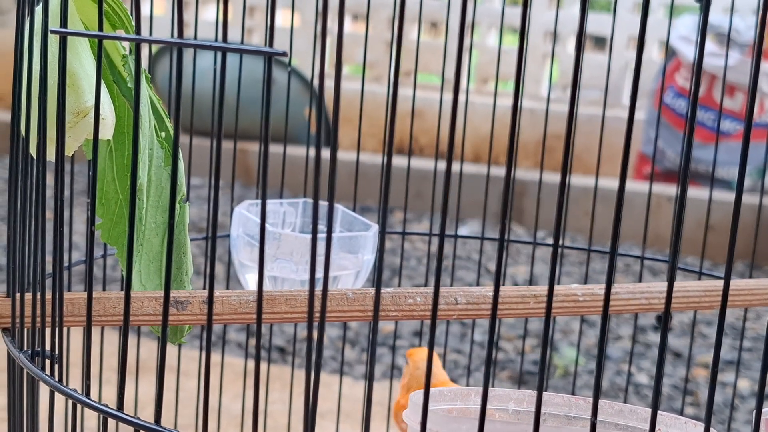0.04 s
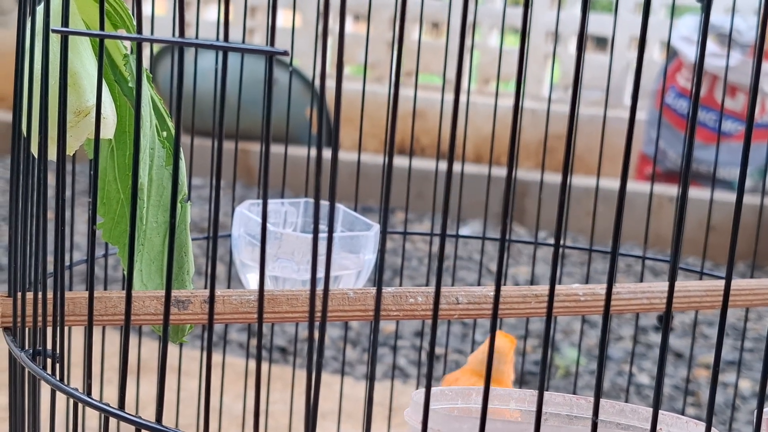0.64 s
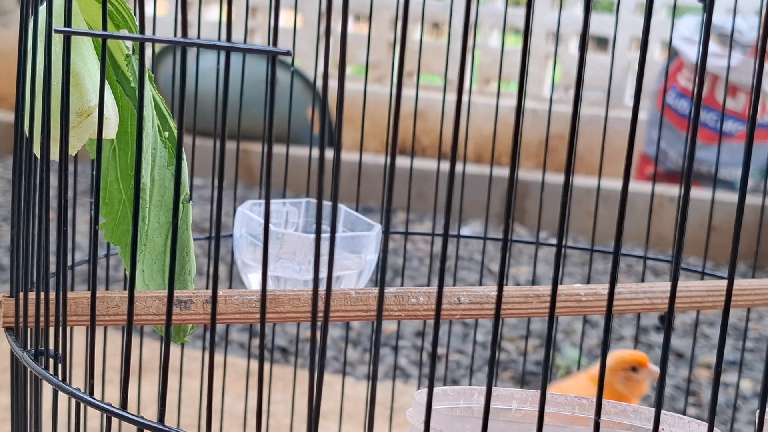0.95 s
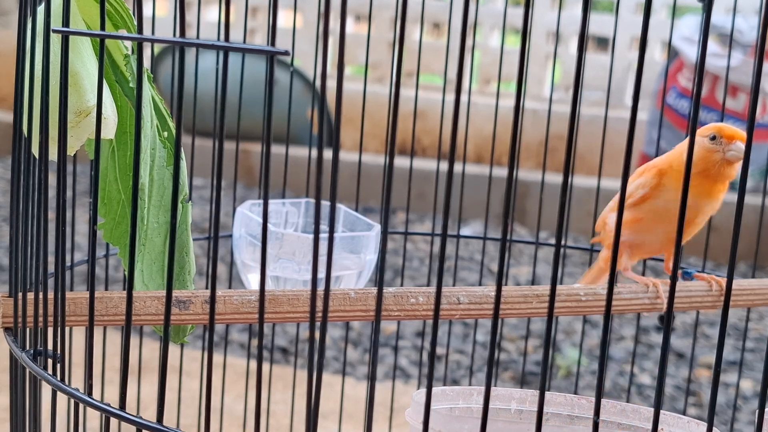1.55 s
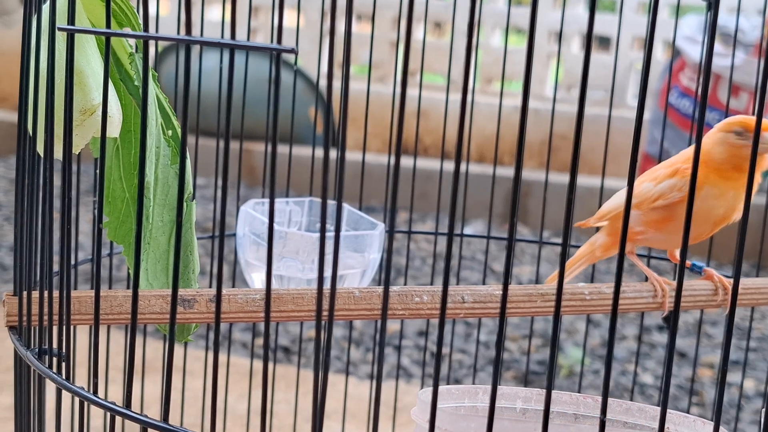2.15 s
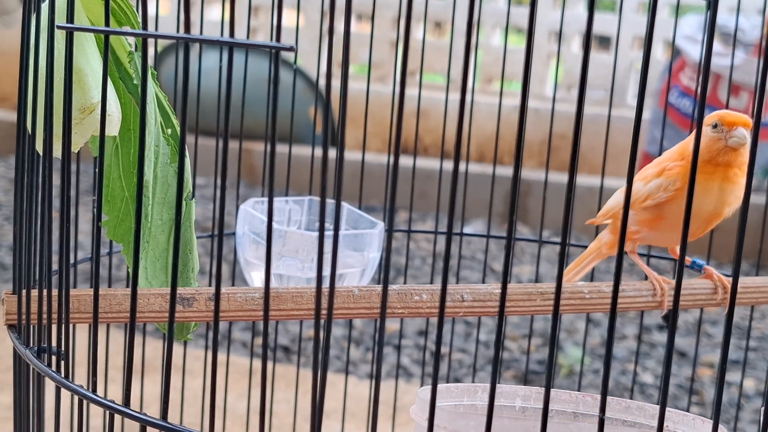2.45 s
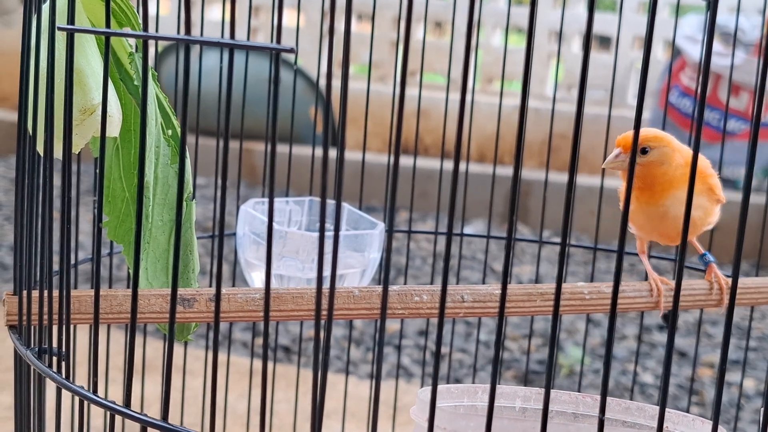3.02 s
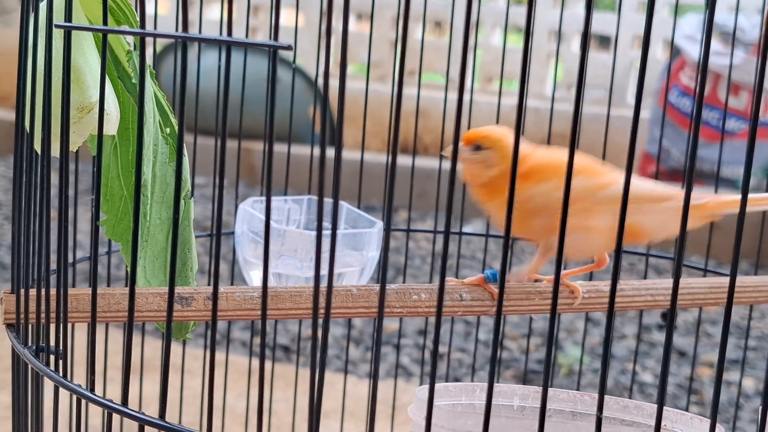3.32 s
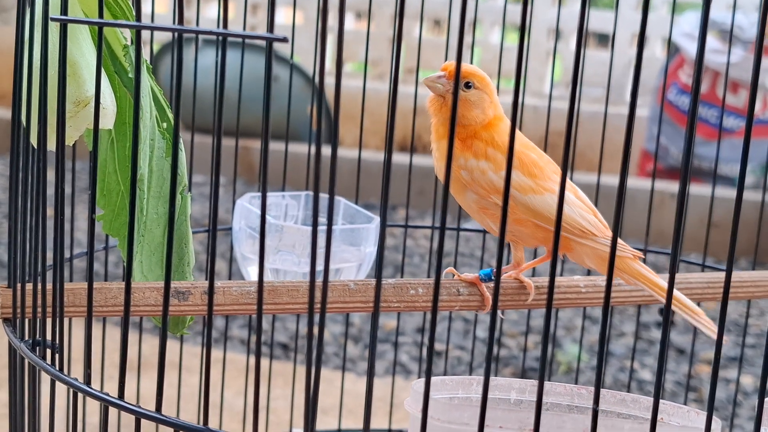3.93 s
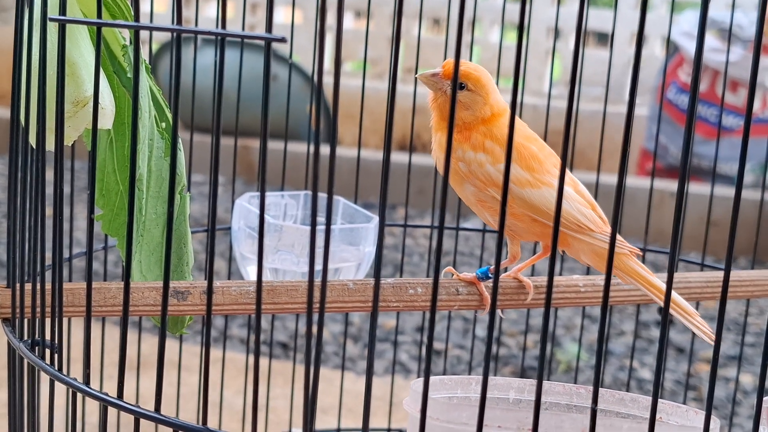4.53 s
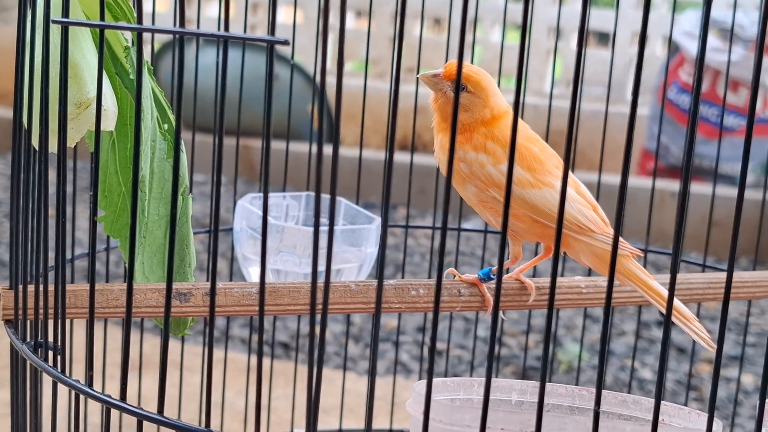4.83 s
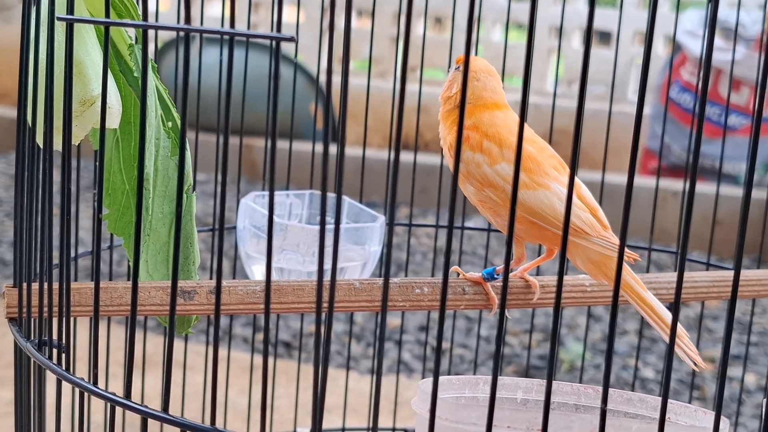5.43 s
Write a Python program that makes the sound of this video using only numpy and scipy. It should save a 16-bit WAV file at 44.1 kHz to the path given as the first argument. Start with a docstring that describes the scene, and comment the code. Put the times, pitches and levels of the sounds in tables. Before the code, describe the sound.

Outdoors, a low motor hums steadily under a soft wash of air, faint bouts of insect buzzing and distant warbling birds. Near the microphone, a canary's claws and beak tick on its cage. The canary lets out a rapid run of sharp, high chirps, rustles faintly, then chirps a second run, the yard walls briefly throwing the sound back. After that, only the hum and the faint background remain.

```python
"""Caged canary in a yard

A close canary gives two quick bursts of sharp chirps; in some, both sides of its syrinx sound at once.
Its feet and beak tick on the cage, and the yard walls throw the chirps back. Other birds warble softly
further off, an insect buzzes in bouts and a motor hums, over a low wash and a faint hiss."""
import sys
import numpy as np
from scipy import signal
from scipy.fft import rfft, irfft
from scipy.io import wavfile

SR = 44100
rng = np.random.default_rng(int(sys.argv[2]) if len(sys.argv) > 2 else 0)


def transcribe(u):
    """Save the signal u as a 16-bit wav file named by the first command-line argument.

    u: samples, shape (n,) or (channels, n), limited to [-1, 1]; the rate is SR.
    q: integer samples, one column per channel.
    """
    v = np.clip(np.atleast_2d(u).T, -1, 1)
    q = np.round(v * 32767).astype(np.int16)
    wavfile.write(sys.argv[1], SR, q)


N = 250047
TIME_S, BINS_HZ = np.arange(N) / SR, np.fft.rfftfreq(N, 1 / SR)


def amp(db):
    """Decibels to gain."""
    return 10 ** (np.asarray(db) / 20)


def unit(x):
    """Scale to rms 1."""
    return x / np.sqrt(np.mean(x ** 2) + 1e-20)


def curve(points, hz):
    """Interpolate a table on a log-frequency axis."""
    freq_hz, value = np.transpose(points)
    return np.interp(np.log(hz + 1), np.log(freq_hz + 1), value)


def add(mix, start_s, sound):
    """Mix a sound in at start_s."""
    part = mix[..., max(round(start_s * SR), 0):][..., :sound.shape[-1]]
    part += sound[..., :part.shape[-1]]


def pan(side_db):
    """Left and right gains for a level difference."""
    gains = amp([[side_db / 2], [-side_db / 2]])
    return gains / np.sqrt(np.mean(gains ** 2))


def noise(spectrum):
    """Shaped noise, rms 1."""
    return unit(irfft(rfft(rng.standard_normal(N)) * spectrum, N))


def peak(hz, width_hz):
    """Magnitude of a steep-sided resonance."""
    return 1 / (1 + ((BINS_HZ - hz) / width_hz) ** 2)


def wobble(size, rate_hz):
    """Smooth random motion, rms about 1."""
    knots = rng.standard_normal(int(size * rate_hz / SR) + 2)
    return np.interp(np.arange(size) * rate_hz / SR, np.arange(len(knots)), knots)


def diffuse_noise(spectrum, left_lag_s=0.00019):
    """Diffuse sound at two microphone ports: alike in the bass, less so in the treble."""
    # freq_hz, coherence
    likeness = [(120, 1), (240, 0.84), (480, 0.81), (950, 0.54), (1900, 0.17), (8000, 0.19)]
    # freq_hz, left_over_right_db
    balance = [(60, 7), (120, -2.5), (480, 2), (1900, -2), (7500, -0.5), (15000, -2)]
    left, other = rfft(rng.standard_normal((2, N))) * spectrum
    coherence = np.clip(curve(likeness, BINS_HZ), 0, 1)
    right = coherence * left + np.sqrt(1 - coherence ** 2) * other
    right *= np.exp(2j * np.pi * BINS_HZ * left_lag_s)
    lean = amp(curve(balance, BINS_HZ) / 2)
    return unit(irfft(np.array([left * lean, right / lean]), N))


def motor(hum_hz=99.85, wander=0.0027, waver_db=1.5, left_lag_rad=0.41):
    """A wavering low hum with weaker, unsteady tones above and below it."""
    # hum envelope: time_s, level_db
    hum_levels = [(0.0, -43.5), (0.69, -40.5), (0.76, -48.5), (1.42, -39.5), (1.77, -44.5), (2.18, -34.5),
                  (2.24, -47.5), (2.34, -37), (2.42, -50), (2.49, -39), (2.95, -41.5), (3.02, -49),
                  (3.08, -38.5), (3.43, -42), (3.89, -38.5), (3.93, -46), (5.64, -40.5), (5.67, -40)]
    # motor tones: pitch_hz, width_hz, level_db
    tones = [(44, 30, -62.5), (71, 17, -53), (154.8, 3.8, -55), (189.5, 4.3, -52.5), (203.6, 9.7, -51.5),
             (303, 45, -65.5), (348.5, 4.6, -65), (403.6, 2.6, -61), (434.3, 22, -62), (488, 17, -65),
             (538.5, 4.6, -62), (720, 2, -77), (1344, 1.3, -69.5)]
    time_s, level_db = np.transpose(hum_levels)
    phase = 2 * np.pi * np.cumsum(hum_hz * (1 + wander * wobble(N, 5.69))) / SR
    level = amp(np.interp(TIME_S, time_s, level_db) + waver_db * wobble(N, 16))
    hum = np.sqrt(2) * level * np.sin([phase - left_lag_rad, phase])
    density = sum(amp(db) ** 2 * peak(hz, width) ** 2 / (width * np.pi / 2) for hz, width, db in tones)
    drone = np.sqrt(density.sum() * SR / N) * diffuse_noise(np.sqrt(density))
    return pan(side_db=1.5) * hum + drone


def outdoors(wash_db=-47.5, cutoff_hz=2000, hiss_db=-62.5, drift_db=0.5):
    """Steady low wash and a faint hiss whose level drifts."""
    # wash spectrum: freq_hz, relative_db
    wash_shape = [(15, -52), (25, -33), (42, -15.5), (95, -8), (126, -11.5), (190, -21.5), (250, -17),
                  (400, -22.5), (600, -22.5), (1000, -27.5), (2000, -33.5)]
    # hiss spectrum: freq_hz, relative_db
    hiss_shape = [(1200, -26), (2000, 5.5), (3000, 4), (3900, -3), (4700, -1.5), (5600, -5.5), (6600, 2),
                  (8300, -8.5), (9900, 1), (12000, -17), (13800, -10), (16000, -14.5)]
    wash = diffuse_noise(amp(curve(wash_shape, BINS_HZ)) / (1 + (BINS_HZ / cutoff_hz) ** 8))
    hiss = diffuse_noise(amp(curve(hiss_shape, BINS_HZ)))
    return amp(wash_db) * wash + amp(hiss_db + drift_db * wobble(N, 5.62)) * hiss


def cage_taps():
    """Claws and beak tick, feathers brush; heavier contacts also knock the perch and dish."""
    # contacts: start_s, level_db, body_over_tick_db, decay_s
    contacts = [(0.054, -56, -14, .008), (.322, -49.5, 7.5, 0.0039), (.9245, -52, 8, 0.0036),
                (.995, -51, 4, 0.0023), (1.0024, -45.5, 11, 0.0027), (1.0202, -50.5, 3, .0035),
                (2.499, -57, -7, 0.025), (2.675, -60.5, -8, 0.032), (2.805, -59, -17, .008),
                (3.135, -57.5, -4, 0.032), (3.458, -57.5, 4, 0.0038)]
    # tick spectrum: freq_hz, relative_db
    tick_shape = [(1500, -31), (3500, -19), (5500, 1.5), (8000, 1.5), (11000, -3), (15000, -4)]
    # body resonances: freq_hz, width_hz, relative_db
    modes = [(1060, 130, 6.5), (1630, 300, 4), (2300, 220, -11), (4300, 690, -11.5)]
    tick = noise(amp(curve(tick_shape, BINS_HZ)))
    body = noise(sum(amp(db) * peak(hz, width) for hz, width, db in modes))
    out, t = np.zeros((2, N)), np.arange(SR // 10) / SR
    for start_s, level_db, body_db, decay_s in contacts:
        span = rng.integers(0, N - len(t), (2, 1)) + np.arange(len(t))
        contact = tick[span] + amp(body_db) * body[span[0]]
        add(out, start_s, amp(level_db) * contact * np.exp(-t / decay_s))
    return out


def yard_reverb(x, t60_scale, gap_s):
    """Diffuse tail, each band dying at its own rate."""
    # yard decay: freq_hz, base_t60_s
    decay = [(500, 0.055), (3000, 0.39), (6000, 0.31), (10000, 0.21), (15000, 0.13)]
    reflections = rng.choice([-1., 1.], (2, SR)) * (rng.random((2, SR)) < .1)
    reflections *= np.arange(SR) > gap_s * SR
    hz, t, bands = signal.stft(reflections, SR, nperseg=256)
    t60_s = t60_scale * curve(decay, hz)[:, None]
    tail = signal.istft(bands * amp(-60 * t / t60_s), SR, nperseg=256)[1]
    return signal.fftconvolve(x, tail / np.linalg.norm(tail[0]), axes=1)[:, :N]


def far_birds(waver=0.086, direct_db=-6, reverb_db=-1):
    """Soft slurred notes and a trill, blurred by distance."""
    # notes: start_s, length_s, start_hz, end_hz, source_db, roughness
    notes = [(0.082, 0.056, 2870, 2730, -69, 0.06), (.50, 0.2, 2285, 2410, -66, 0.46),
             (0.628, 0.091, 2470, 2476, -63.5, 0.27), (0.613, 0.043, 4010, 4030, -57.5, 0.25),
             (0.618, 0.057, 3650, 3340, -63, 1.18), (0.618, 0.043, 6050, 6100, -63, 0.54),
             (1.141, .10, 2426, 2920, -62.5, 0.07), (1.138, .056, 2980, 2770, -66, 0),
             (1.363, .08, 3016, 2875, -62.5, .25), (1.57, 0.076, 3010, 2700, -66, 0.27),
             (1.73, 0.27, 2900, 2610, -61, 0.22), (2.194, 0.081, 3350, 3130, -63.5, 0.95),
             (2.29, 0.036, 2760, 2720, -59.5, 0.04), (2.622, 0.13, 2300, 2390, -63, 0.38),
             (2.74, 0.11, 2424, 2583, -60, 0.17), (3.238, 0.068, 2360, 2900, -57, .2)]
    song = np.zeros((2, N))
    for start_s, length_s, start_hz, end_hz, source_db, roughness in notes + far_trill():
        size = int(length_s * SR)
        hz = np.linspace(start_hz, end_hz, size) * (1 + waver * roughness * wobble(size, 488))
        level = np.sqrt(2) * amp(source_db) * signal.windows.tukey(size, .5)
        add(song, start_s, level * np.sin(2 * np.pi * np.cumsum(hz) / SR))
    return amp(direct_db) * song + amp(reverb_db) * yard_reverb(song, t60_scale=0.99, gap_s=0.0059)


def insect(pitch_hz=6950, width_hz=330, octave_db=-17, swell_s=0.32, stop_s=0.046):
    """A narrow-band buzz; each bout swells slowly and stops fast."""
    # bouts: start_s, end_s, level_db
    bouts = [(0.392, 1.228, -64.5), (2.02, 2.632, -62.5), (3.247, 4.075, -63.5), (4.722, 5.533, -64)]
    level = np.zeros(N)
    for start_s, end_s, level_db in bouts:
        ramp = np.minimum((TIME_S - start_s) / swell_s, (end_s - TIME_S) / stop_s)
        level += amp(level_db) * np.clip(ramp, 0, 1)
    spectrum = peak(pitch_hz, width_hz) + amp(octave_db) * peak(2 * pitch_hz, 2 * width_hz)
    return level * diffuse_noise(spectrum)


def chirp_contour(t, length_s, start_hz, top_hz, leap_at_s, leap_s, sag_hz):
    """Pitch scoops in, leaps and sags; level swells, holds and ebbs, weaker below the median pitch."""
    scoop_hz = 405 * np.exp(-t / 0.0071)
    leap = .5 + .5 * np.tanh(2 * (t - leap_at_s) / leap_s)
    hz = start_hz - scoop_hz + (top_hz - start_hz) * leap - sag_hz * (t / length_s) ** 3.5
    attack_db = -16.5 * np.maximum(1 - t / .013, 0) ** 2
    release_db = -7 * np.maximum(1 - (length_s - t) / .010, 0) ** 2
    flat_khz = np.maximum(np.median(hz) - hz, 0) / 1000
    return hz, attack_db + release_db - 7.5 * flat_khz


def syrinx(hz, level_db, jitter, shimmer=0.051):
    """One vibrating side of the syrinx: pitch, phase and amplitude."""
    size = len(hz)
    pitch_hz = hz * (1 + jitter * wobble(size, 1450))
    level = np.sqrt(2) * amp(level_db) * signal.windows.tukey(size, .14)
    level *= 1 + shimmer * wobble(size, 1206)
    return pitch_hz, 2 * np.pi * np.cumsum(pitch_hz) / SR, level


def canary(rasp_db=-29, hoarse_db=-22, upper_pan_db=-3, flutter_db=4.5, blur_rad=0.26, tremor_db=0.2):
    """Swept whistles whose overtones grow with effort; two voices add sum and difference tones."""
    # chirps: start_s, length_s, start_hz, top_hz, leap_at_s, leap_s, sag_hz,
    # level_db, octave_db, high_overtones_db, left_over_right_db, left_lead_s
    chirps = [ (1.813, 0.038, 2470, 3793, 0.014, .0045, 44, -38, -3, -23, 0.5, -6e-5),
              (1.888, 0.02, 2510, 3523, .0072, 0.0076, 78, -25.5, -6.5, -12, .5, -6e-5),
              (1.9645, .022, 2650, 3110, 0.0046, 0.0055, 200, -27, -1, -13, 0, -6e-5),
              (2.034, 0.037, 2690, 3580, .0290, 0.0087, 20, -33.5, -2, -8, .5, -4e-5),
              (3.571, 0.044, 2960, 4284, 0.0039, 0.0063, 140, -36, -22, -21, 4.5, -1e-5),
              (3.645, .032, 2720, 3560, 0.007, 0.0083, 810, -28.5, -3.5, -10.5, 5.5, 6e-5),
              (3.721, .028, 2780, 3343, 0.007, 0.0088, 540, -25, -3.5, -12, 3, 6e-5),
              (3.792, 0.031, 3400, 3423, 0.0024, 0.0042, 390, -27, 0.5, -20, 2.5, 5e-5),
              (3.874, 0.028, 2500, 3640, 0.02, 0.011, 870, -33, 0, -9, 3, 3e-5)]
    # second side of the syrinx, by chirp index: start_hz, end_hz, level_db, growth_db
    second_voice = {3: (4380, 3880, -39, 1), 7: (4688, 3911, -29, 15.5)}
    # combination tones: first_voice_multiple, second_voice_multiple
    mixed_orders = [(1, 1), (-1, 2), (0, 2), (1, 2), (2, 1), (2, 2)]
    # per combination tone: gain_db
    mixed_db = [-17.5, -10, -13.5, -14, -34, -10]
    # throat colour: freq_hz, gain_db
    throat = [(2000, -2), (4900, -3), (6200, -14.5), (8000, -8.5), (10000, -3), (12000, -9.5), (13500, -12),
              (14500, 3), (15600, -14)]
    whistle, bright = np.zeros((2, 2, N))
    rasp = noise(amp(curve(throat, BINS_HZ)) / (1 + BINS_HZ / 9000) * (BINS_HZ > 2200))
    for i, chirp in enumerate(chirps):
        start_s, length_s, *shape, level_db, octave_db, high_db, side_db, lead_s = chirp
        t = np.arange(0, length_s, 1 / SR)
        size = len(t)
        two_sided = i in second_voice  # the sides disturb each other and turn hoarse
        jitter, noise_db = (0.017, hoarse_db) if two_sided else (.009, rasp_db)
        sweep_hz, swell_db = chirp_contour(t, length_s, *shape)
        voice_db = level_db + swell_db - tremor_db * wobble(size, 293)
        hz, phase, level = syrinx(sweep_hz, voice_db, jitter)
        port_shift = 2 * np.pi * hz * lead_s * np.array([[.5], [-.5]])
        phase = phase + port_shift
        effort = level / level.max()
        upper = amp(noise_db) * level * rasp[round(start_s * SR):][:size] * np.ones((2, 1))
        for k in range(2, 7):
            strength = amp(octave_db) if k == 2 else amp(high_db) * effort ** .75
            colour = amp(curve(throat, k * hz)) * (k * hz < SR / 2)
            flutter = amp(flutter_db * wobble(size, 450))
            overtone = np.sin(k * phase + blur_rad * wobble(size, 2500))
            upper += level * strength * colour * flutter * overtone
        if two_sided:
            from_hz, to_hz, second_db, growth_db = second_voice[i]
            voice2_db = second_db + swell_db + growth_db * (t / length_s - 1)
            _, phase2, level2 = syrinx(np.linspace(from_hz, to_hz, size), voice2_db, jitter)
            phase2 = phase2 + port_shift
            upper += level2 * np.sin(phase2)
            for (m, n), db in zip(mixed_orders, mixed_db):
                upper += amp(db) * level2 * effort * np.sin(m * phase + n * phase2)
        add(whistle, start_s, pan(side_db) * level * np.sin(phase))
        add(bright, start_s, pan(side_db + upper_pan_db) * upper)
    return whistle, bright


def echoes(x, spread_s=0.00077):
    """Single reflections, reaching each port at a slightly different time."""
    # cage and wall: delay_s, gain_db
    reflections = [(.0045, -18), (0.025, -16.5), (.030, -20)]
    out = np.zeros((2, N))
    for delay_s, gain_db in reflections:
        for port, source in zip(out, x):
            add(port, delay_s + spread_s * rng.uniform(-0.987, 1), amp(gain_db) * source)
    return out


def far_trill(start_s=3.005, count=6, step_s=0.05, note_s=0.0755, slur_hz=600, roughness=.8):
    """Note rows of a hoarse trill: each slurs down; the series sinks, swells and fades."""
    after_s = np.arange(count) * step_s
    pitch_hz = 3650 + 600 * np.exp(-after_s / .09)
    source_db = -57.5 - 1.5 * np.linspace(-1, 1, count) ** 2
    return [(start_s + s, note_s, hz, hz - slur_hz, db, roughness)
            for s, hz, db in zip(after_s, pitch_hz, source_db)]


def scene(beam_db=4.0):
    """The canary, its cage and their reflections over the background."""
    whistle, bright = canary()
    taps = cage_taps()
    bird = whistle + bright
    thrown = whistle + amp(beam_db) * bright  # the beak beams overtones past the microphone
    scatter = amp(-12) * yard_reverb(thrown, t60_scale=.45, gap_s=.006)
    walls = amp(-14) * yard_reverb(thrown, t60_scale=1.05, gap_s=.02)
    cage = taps + amp(-4) * yard_reverb(taps, t60_scale=0.91, gap_s=.005)
    return bird + echoes(bird) + scatter + walls + cage + far_birds() + insect() + motor() + outdoors()


def record(dry):
    """Steep low-pass at 16.1 kHz."""
    lowpass = signal.firwin(511, 16100, window=("kaiser", 9), fs=SR)
    return signal.oaconvolve(dry, lowpass[None], "same")


dry = scene()
out = record(dry)
transcribe(out)
```